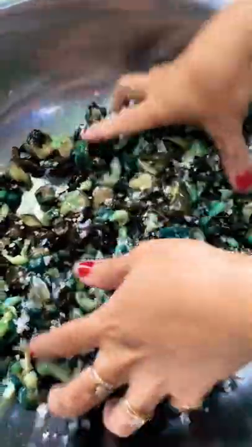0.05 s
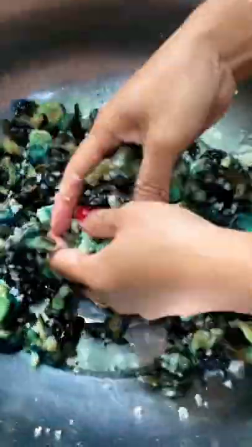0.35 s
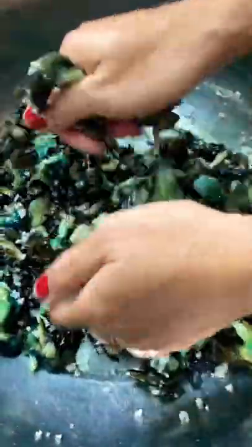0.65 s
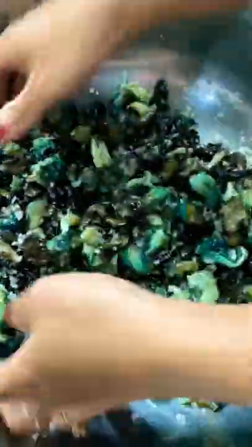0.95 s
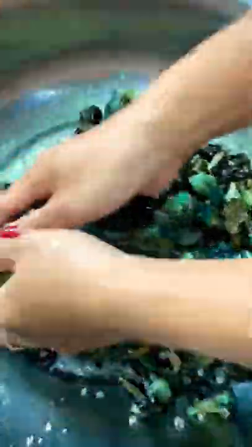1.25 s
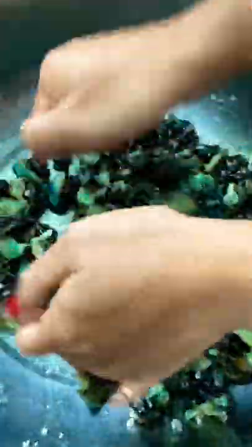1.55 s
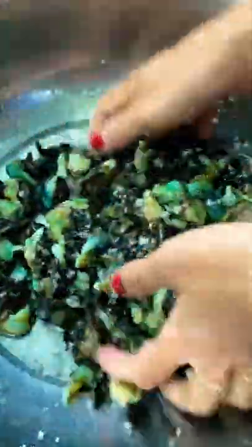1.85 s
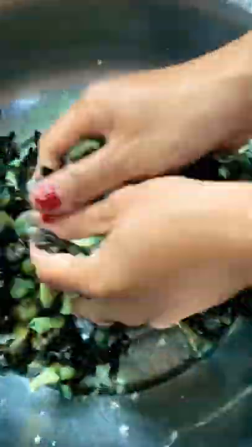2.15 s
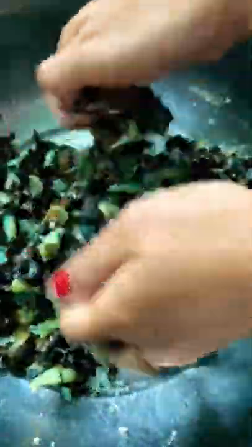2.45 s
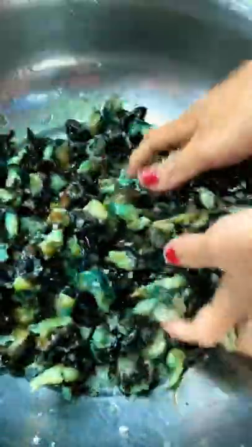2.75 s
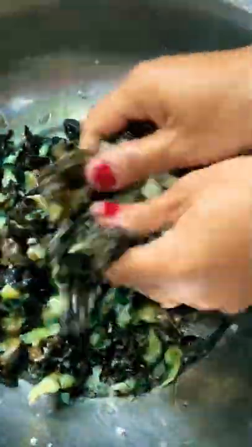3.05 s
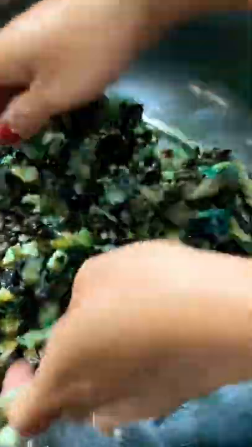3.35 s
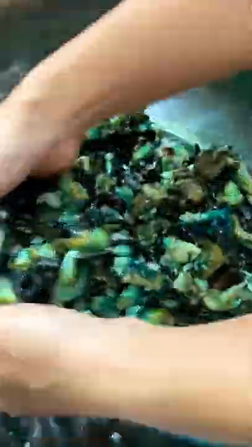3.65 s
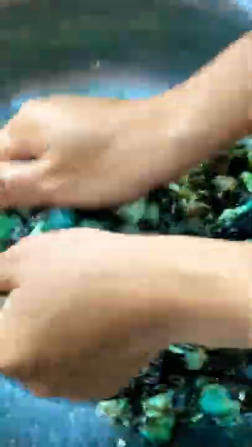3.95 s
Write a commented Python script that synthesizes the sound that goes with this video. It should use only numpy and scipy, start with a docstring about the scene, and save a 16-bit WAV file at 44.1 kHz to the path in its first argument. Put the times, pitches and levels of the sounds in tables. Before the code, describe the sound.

Wet snail shells rattle densely as hands scoop through them in a metal basin.

```python
"""A dense rattle of wet snail shells: two hands scoop through a heap in a metal basin, five times, close by.
Each scoop swells as loose shells tumble and those beneath crunch; bright clacks mark shell hitting shell.
The hollows between the closing hands ring and sink in pitch, squeezed shells knock dully, and the
heap settles in a trickle. The basin rings, and booms faintly when leaned on, over a low room rumble."""
import sys
import numpy as np
from scipy import signal
from scipy.fft import rfft, irfft
from scipy.io import wavfile

SR = 44100
rng = np.random.default_rng(int(sys.argv[2]) if len(sys.argv) > 2 else 0)


def int16_out(signal):
    """Quantize to a 16-bit WAV file."""
    q = np.round(np.clip(np.atleast_2d(signal).T, -1, 1) * 32767)
    wavfile.write(sys.argv[1], SR, q.astype(np.int16))


N = 176400
TIME_S = np.arange(N) / SR
BIN_HZ = np.fft.rfftfreq(2 * N, 1 / SR)


def amp(db):
    """Decibels to gain."""
    return 10 ** (np.asarray(db) / 20)


def unit_rms(x):
    """Scales to rms 1."""
    return x / np.sqrt(np.mean(x ** 2) + 1e-20)


def curve(table, column=1):
    """One table column, interpolated over log frequency."""
    rows = np.array(table, float)
    return np.interp(np.log(BIN_HZ + 1), np.log(rows[:, 0]), rows[:, column])


def colour(x, spectrum):
    """Minimum-phase filter of unit noise gain."""
    cepstrum = irfft(np.log(unit_rms(amp(curve(spectrum)))))
    cepstrum[1:N] *= 2
    cepstrum[N + 1:] = 0
    return irfft(rfft(x, 2 * N) * np.exp(rfft(cepstrum)))[:, :N]


def add(mix, start_s, sound):
    """Mixes a sound in at a time."""
    part = mix[:, max(round(start_s * SR), 0):][:, :sound.shape[1]]
    part += sound[:, :part.shape[1]]


def resonate(x, hz, width_hz):
    """A steady or gliding resonance of gain 1."""
    carrier = np.exp(2j * np.pi * np.cumsum(hz * np.ones(x.shape[1])) / SR)
    pole = np.exp(-np.pi * width_hz / SR)
    return 2 * (carrier * signal.lfilter([1 - pole], [1, -pole], x / carrier + 1e-18)).real


def shell(tick_s, ring_gain, low_hz=1784.5, high_hz=14670, t60_s=.024, size=1400):
    """One shell touched: a scratchy tick and three brief modes, heard along two paths."""
    t = np.arange(size) / SR
    hz = np.exp(rng.uniform(np.log(low_hz), np.log(high_hz), (3, 1)))
    modes = np.sqrt(hz) * np.sin(2 * np.pi * (hz * t + rng.random((2, 3, 1))))
    ring = modes.sum(1) * amp(-60 * t / t60_s)
    tick = rng.standard_normal((2, size)) * np.exp(-t / tick_s)
    return unit_rms(unit_rms(tick) + ring_gain * unit_rms(ring)) / np.sqrt(size)


def contacts(level, peak_per_s, spread_db, tick_s, ring_gain, count, rate_exponent=.3):
    """Random contacts of many shells: denser and stronger as the level rises."""
    chance = peak_per_s * (level / level.max()) ** rate_exponent / SR
    strengths = amp(spread_db * np.minimum(rng.exponential(1, N), 2.5))
    hits = unit_rms(strengths) * (rng.random(N) < chance) * level / np.sqrt(chance)
    which = rng.integers(0, count, N)
    shells = [shell(tick_s, ring_gain) for _ in range(count)]
    out = np.zeros((2, N))
    for at in np.flatnonzero(hits):
        add(out, at / SR, hits[at] * shells[which[at]])
    return out


# Each row: times in seconds of digging in, full push, hands meeting and rest,
# then relative levels in dB of rattle, settling and crunch.
SCOOP_STROKES = [(-.08, 0.097, 0.25, 0.65, -31.5, -38.5, -41), (0.806, 0.853, 1.125, 1.44, -35.5, -37, -38),
                 (1.669, 1.787, 2.025, 2.415, -30.5, -38, -39.5),
                 (2.465, 2.58, 2.865, 3.31, -33, -37.5, -38.5),
                 (3.392, 3.56, 3.715, 4.003, -31.5, -38.5, -35)]
# Each row, in both tables: frequency in Hz, relative level in dB.
RATTLE_SPECTRUM = [(200, -14.5), (700, -7.5), (1300, -12.5), (2300, -9), (3300, 0), (4400, -0.5),
                   (5250, 1.5), (6200, -0.5), (7500, -1.5), (11000, -5), (15500, -12)]
CRUNCH_SPECTRUM = [(80, 5), (170, -1), (330, 3.5), (550, 6), (800, 1), (1150, 2), (1700, 3), (2600, -4.5),
                   (4500, -8), (9000, -85)]

def heap(dig_db=-8.5, loose_db=-16.5, eased_db=-7, fade_db=-7.5, idle_db=-55, let_go_s=.028, ramp_s=.0051):
    """Scoops swell, hold and let go: loose shells rattle and tumble, squeezed ones crunch."""
    top = np.full(N, amp(idle_db))
    deep = np.full(N, amp(idle_db + eased_db))
    for start_s, full_s, meet_s, rest_s, rattle_db, settle_db, crunch_db in SCOOP_STROKES:
        moving = np.clip((TIME_S - start_s) / ramp_s, 0, 1) * np.clip(1 - (TIME_S - rest_s) / ramp_s, 0, 1)
        top_db = np.interp(TIME_S, [start_s, full_s, meet_s, meet_s + let_go_s, rest_s],
                           [rattle_db + dig_db, rattle_db, rattle_db, settle_db, settle_db + fade_db])
        squeeze_db = np.interp(TIME_S, [start_s, meet_s, meet_s + let_go_s, rest_s],
                               [loose_db, 0, eased_db, eased_db + fade_db])
        top = np.hypot(top, moving * amp(top_db))
        deep = np.hypot(deep, moving * amp(crunch_db + squeeze_db))
    rattle = contacts(top, peak_per_s=1800, spread_db=-.5, tick_s=.0019, ring_gain=1, count=300)
    tumble = contacts(top, peak_per_s=220, spread_db=2.5, tick_s=.0047, ring_gain=1.8, count=100)
    crunch = contacts(deep, peak_per_s=700, spread_db=7, tick_s=.0024, ring_gain=.66, count=200)
    loose = amp(-1.34) * rattle + amp(-8) * tumble
    return colour(loose, RATTLE_SPECTRUM) + colour(crunch, CRUNCH_SPECTRUM)


# Each row: frequency in Hz, width in Hz, gain in dB.
BASIN_MODES = [(793, 44, 3.5), (2340, 360, -7), (5150, 83, -6.5)]

def basin_ring(shells):
    """The shells excite the modes of the loaded basin."""
    return sum(amp(db) * resonate(shells, hz, width_hz) for hz, width_hz, db in BASIN_MODES)


def room_scatter(x, t60_s=.2, gain_db=-10, gap_s=.002, size=16000):
    """Short, sparse reflections from the basin wall and the room."""
    t = np.arange(size) / SR
    echoes = rng.standard_normal((2, size)) * (rng.random((2, size)) < .1)
    tail = echoes * (t > gap_s) * amp(-60 * t / t60_s)
    return amp(gain_db) * signal.fftconvolve(x, unit_rms(tail) / np.sqrt(size), axes=1)[:, :N]


# Each row: frequency in Hz, relative level in dB.
RUMBLE_SPECTRUM = [(22, -51), (36, -17), (60, -0.5), (85, -7.5), (130, -11), (250, -25), (700, -32),
                   (3000, -33), (15000, -42.5)]

def room_rumble(level_db=-46):
    """Steady low noise of the room."""
    return amp(level_db) * colour(rng.standard_normal((2, N)), RUMBLE_SPECTRUM)


# Each row: opening and shutting in seconds, level in dB, first and last pitch in Hz. Two rows a scoop.
HAND_HOLLOWS = [(0.117, 0.265, -44.5, 860, 760), (0.05, 0.262, -39.5, 2910, 1470),
                (0.837, 1.137, -52, 860, 710), (0.926, 1.144, -38.5, 3650, 1670),
                (1.68, 2.01, -45.5, 920, 670), (1.763, 2.024, -38.5, 2870, 1910),
                (2.555, 2.727, -49.5, 830, 790), (2.653, 2.853, -38, 2700, 2080),
                (3.404, 3.676, -44.5, 833, 776), (3.506, 3.714, -39, 3470, 1600)]

def hollows(rise_s=.015, fall_s=.011, width_at_1khz_hz=310):
    """Scraping shells ring in the spaces between the hands, sinking in pitch as they close."""
    out = np.zeros((2, N))
    scrape = contacts(np.ones(N), peak_per_s=700, spread_db=5.5, tick_s=.00085, ring_gain=.57, count=80)
    for open_s, shut_s, db, first_hz, last_hz in HAND_HOLLOWS:
        rise = np.clip((TIME_S - open_s) / rise_s, 0, 1)
        level = amp(db) * rise * np.exp(-np.maximum(TIME_S - shut_s, 0) / fall_s)
        on = level > 1e-4
        hz = np.interp(TIME_S[on], [open_s, shut_s], [first_hz, last_hz])
        width_hz = width_at_1khz_hz * (hz.mean() / 1000) ** 1.5
        ring = resonate(resonate(scrape[:, on], hz, width_hz), hz, width_hz)
        out[:, on] += level[on] * unit_rms(ring)
    return out


# Each row: start in seconds, relative level in dB, mid-sag pitch in Hz.
BURIED_KNOCKS = [(.22, -25, 1560), (1.006, -17.5, 2400), (1.043, -24, 2130), (1.069, -28, 700),
                 (1.109, -26, 620), (1.132, -23, 1940), (1.244, -27, 1720), (1.302, -30.5, 640),
                 (1.434, -31, 1150), (1.528, -30.5, 2150), (2.019, -23, 2000), (2.483, -28, 800),
                 (2.849, -28, 814), (2.8655, -15, 1700), (2.87, -25.5, 507), (2.93, -29, 619),
                 (3.048, -32, 790), (3.261, -34, 820), (3.647, -24, 590), (3.7, -21, 1780),
                 (3.718, -18.5, 1500), (3.824, -30, 826)]

def knocks(t60_cycles=15, sag=.16, sag_s=.0055, crack_s=.00011, rise_s=.00049, thud_s=.0066, size=2500):
    """A buried shell slips and hits the basin: a crack, a note that sags as it is pressed home, a thud."""
    out, t = np.zeros((2, N)), np.arange(size) / SR
    cycles_per_hz = np.cumsum(1 + sag * (np.exp(-t / sag_s) - .5)) / SR
    crack = 1.1 * (1 - t / crack_s) * np.exp(-t / crack_s)
    rise = np.minimum(t / rise_s, 1)
    thud_band = signal.butter(2, [220, 2800], "band", fs=SR, output="sos")
    for start_s, db, hz in BURIED_KNOCKS:
        note = np.sin(2 * np.pi * (hz * cycles_per_hz + rng.random((2, 1))))
        note *= amp(-60 * t * hz / t60_cycles)
        thud = unit_rms(signal.sosfilt(thud_band, rng.standard_normal((2, size)))) * np.exp(-t / thud_s)
        add(out, start_s, amp(db + 1.5) * (crack + rise * (note + .28 * thud)))
    return out


# Each row: start in seconds, relative level in dB, relative body level in dB,
# burst length in seconds, pitch in Hz.
SHELL_CLACKS = [(0.2855, -30, 0, 0.0037, 2320), (0.52, -25.5, -17, 0.0062, 3700),
                (0.775, -29.5, -3, 0.0084, 6030), (.7953, -21, -3, 0.0036, 6860),
                (0.838, -24, -7, 0.013, 4800), (0.8549, -15.5, -6, 0.0054, 3560),
                (0.897, -15, -33, 0.003, 6450), (.946, -27, -4, 0.0066, 4090),
                (1.225, -25, -4, 0.003, 3900), (1.28, -14.5, -13, 0.0024, 4660),
                (1.3293, -24, -4.5, 0.0052, 3400), (1.391, -27, -2.5, 0.0058, 3800),
                (1.649, -23.5, -35, 0.0036, 6170), (1.705, -24, -29, 0.013, 2450),
                (2.042, -18.5, -15, 0.0026, 5600), (2.232, -20.5, -25, 0.0057, 5430),
                (2.297, -24.5, -1.5, 0.0039, 6300), (2.407, -29.5, -2, 0.0064, 6300),
                (2.4795, -16, -18, 0.0055, 6460), (2.482, -19.5, -4.5, 0.0057, 5670),
                (2.51, -18, -7, 0.012, 5070), (2.53, -18, -23, 0.014, 5930),
                (2.588, -15.5, -11.5, 0.0043, 6000), (2.653, -21.5, -5, 0.0053, 4020),
                (2.703, -26, -2.5, 0.0065, 2400), (2.994, -24, -6.5, 0.0033, 5540),
                (3.114, -27.5, -3, 0.016, 2870), (3.325, -19.5, -12.5, 0.0075, 2430),
                (3.38, -22.5, -28, 0.008, 6300), (3.4248, -14.5, -31, 0.0059, 5400),
                (3.547, -24.5, -1.5, 0.0054, 2400)]

def clacks(rise_s=.00018, tail_s=.028, clink_width_hz=285, body_hz=3000, size=4000):
    """A falling shell chatters on its neighbours for a few milliseconds."""
    out, t = np.zeros((2, N)), np.arange(size) / SR
    body_lowpass = signal.butter(1, body_hz, fs=SR, output="sos")
    for start_s, db, body_db, burst_s, hz in SHELL_CLACKS:
        decay = np.exp(-(t / burst_s) ** 2) + .19 * np.exp(-t / tail_s)
        scratch = rng.standard_normal((2, size)) * np.minimum(t / rise_s, 1) * decay
        chatter = scratch + 2.4 * resonate(scratch, hz, clink_width_hz)
        low_shelf = (amp(body_db + 11) - 1) * signal.sosfilt(body_lowpass, chatter)
        add(out, start_s, amp(db - 6) * (chatter + low_shelf))
    return clack_tone(out)


# Each row: frequency in Hz, relative level in dB.
CLACK_SPECTRUM = [(150, -38.5), (500, -4), (830, -12), (1300, -15.5), (2400, -4), (4300, 0.5), (5500, 2),
                  (7500, 0.5), (11000, 4), (15500, -5)]

def clack_tone(chatter):
    """The clacks sound bright, with a low hump near 500 Hz."""
    return colour(chatter, CLACK_SPECTRUM)


# Each row: start in seconds, level in dB, pitch in Hz.
BASIN_BUMPS = [(1.01, -29, 193), (1.111, -27.5, 79), (1.129, -30.5, 165), (1.266, -32, 112.2),
               (2.864, -26.5, 180), (3.641, -30.5, 143), (3.723, -25.5, 67), (3.788, -23.5, 95)]

def bumps(t60_cycles=8, rise_s=.0033, size=9000):
    """The basin booms for a few cycles when the hands lean on it."""
    out, t = np.zeros((2, N)), np.arange(size) / SR
    for start_s, db, hz in BASIN_BUMPS:
        envelope = amp(db - 60 * t * hz / t60_cycles) * np.minimum(t / rise_s, 1)
        add(out, start_s, envelope * np.sin(2 * np.pi * hz * t) * np.ones((2, 1)))
    return out


def scene():
    """Shells ringing in hands and basin, with booms, room scatter and rumble."""
    shells = heap() + clacks() + knocks()
    ringing = shells + hollows() + basin_ring(shells)
    return ringing + room_scatter(ringing) + bumps() + room_rumble()


# Each row: frequency in Hz, coherence from 0 to 1, left lead in radians, left minus right in dB.
MIC_PAIR = [(100, .99, 0, 0), (300, .95, -.1, .5), (520, .85, -.75, -2), (820, .85, -.7, -4.5),
            (1200, .2, -.8, -1.5), (1600, .88, .3, 0), (2300, .7, .7, 1), (3300, .3, 1.6, -1.3),
            (4300, .45, 1.8, -2.5), (4800, .7, 3.1, -2.5), (5200, .5, 4.9, -.7), (5600, .82, 6.7, 0),
            (9000, .72, 8.2, 0), (11000, .85, 8.95, 0), (12200, .992, 9.4, 0), (15500, .997, 9.42, 0)]

def record(dry, cutoff_hz=15800):
    """Two microphone ports, alike in the bass and opposed in the top treble; then the band limit."""
    a, b = rfft(dry, 2 * N)
    coherence, lead_rad, balance_db = (curve(MIC_PAIR, column) for column in (1, 2, 3))
    tilt = amp(balance_db / 2)
    left = a * tilt
    right = (coherence * a + np.sqrt(1 - coherence ** 2) * b) * np.exp(-1j * lead_rad) / tilt
    pair = irfft(np.array([left, right]))[:, :N]
    lowpass = signal.firwin(511, cutoff_hz, window=("kaiser", 9), fs=SR)
    return signal.oaconvolve(pair, lowpass[None], "same")


dry = scene()
out = record(dry)
int16_out(out)
```